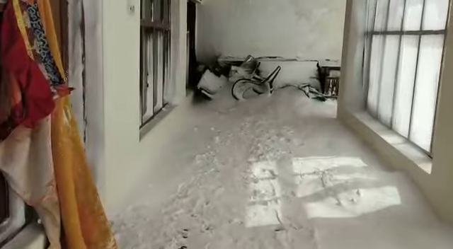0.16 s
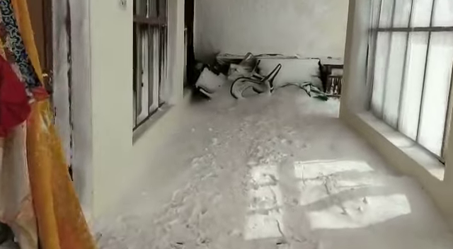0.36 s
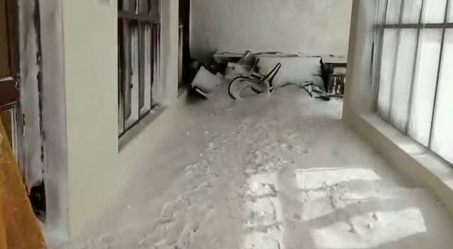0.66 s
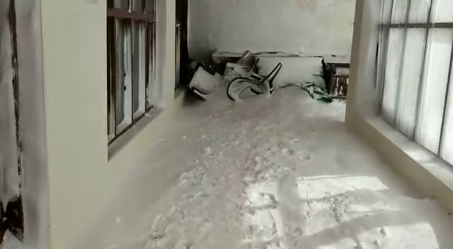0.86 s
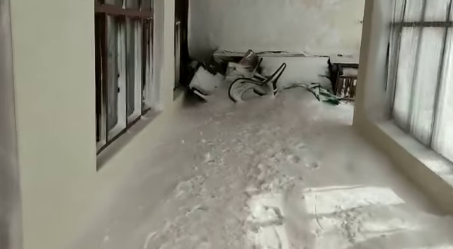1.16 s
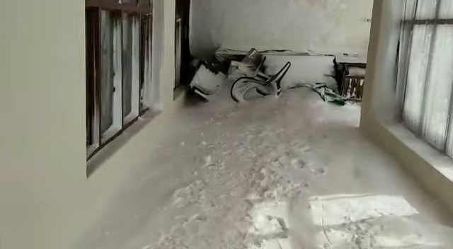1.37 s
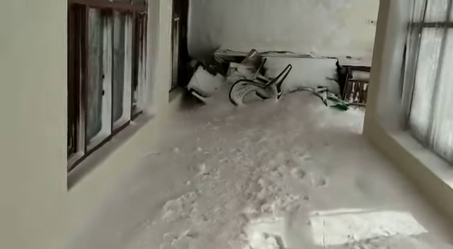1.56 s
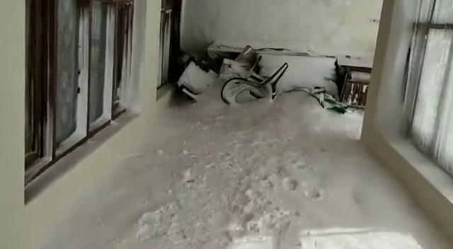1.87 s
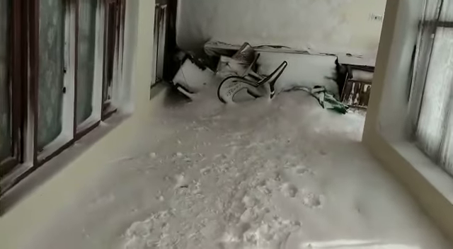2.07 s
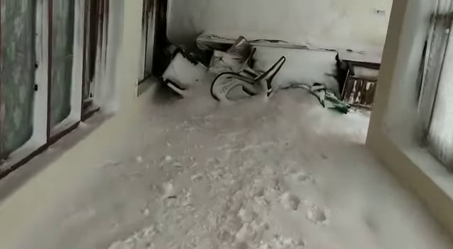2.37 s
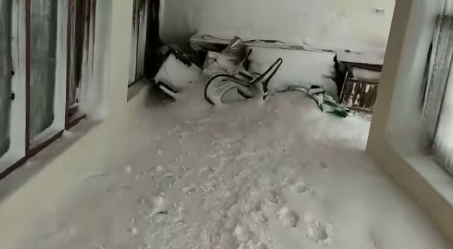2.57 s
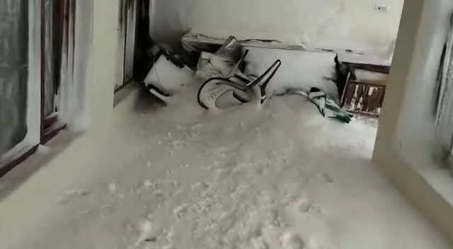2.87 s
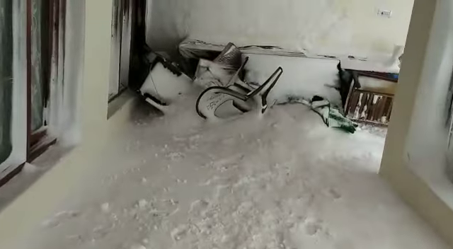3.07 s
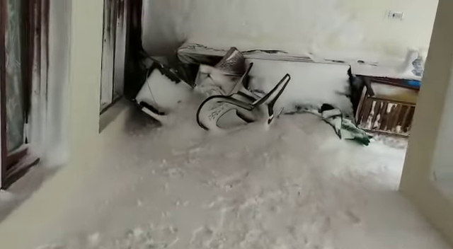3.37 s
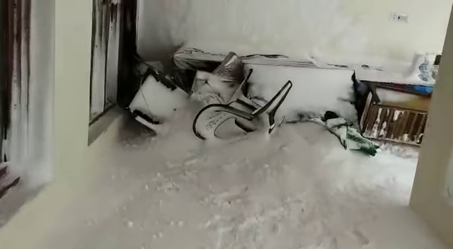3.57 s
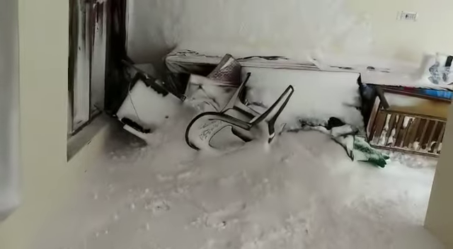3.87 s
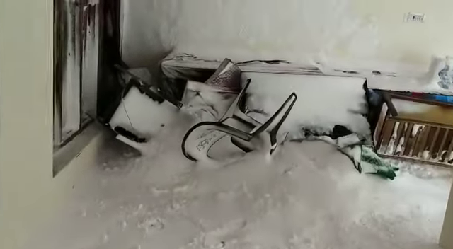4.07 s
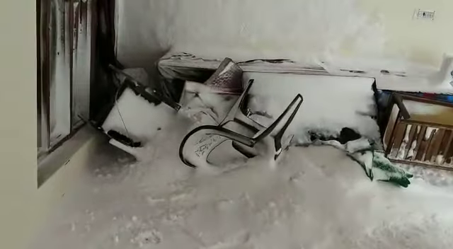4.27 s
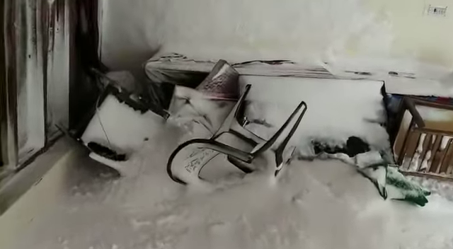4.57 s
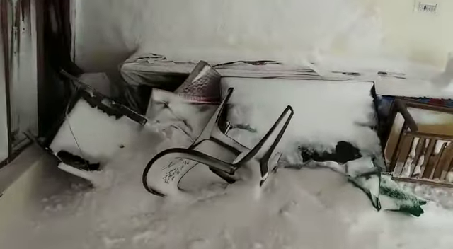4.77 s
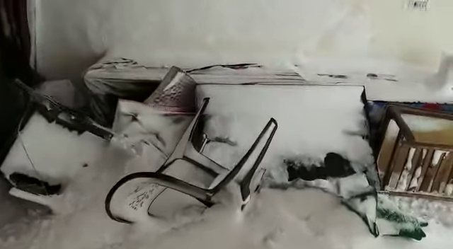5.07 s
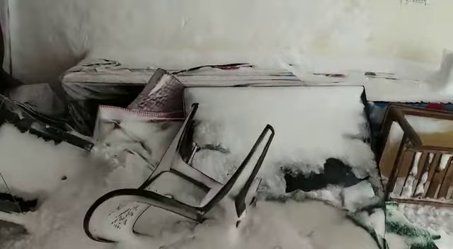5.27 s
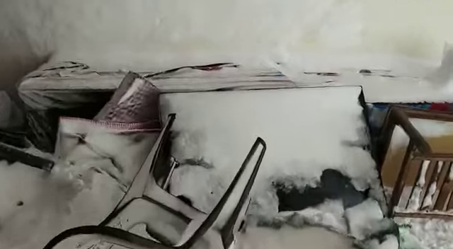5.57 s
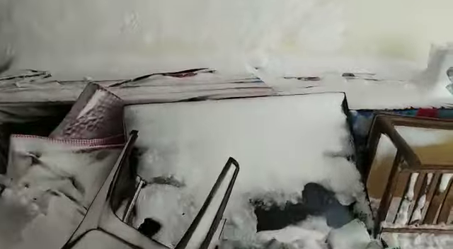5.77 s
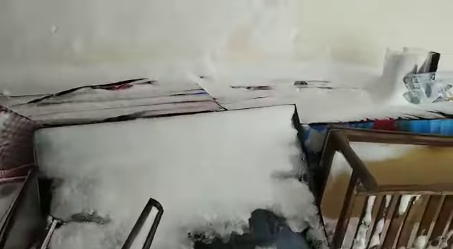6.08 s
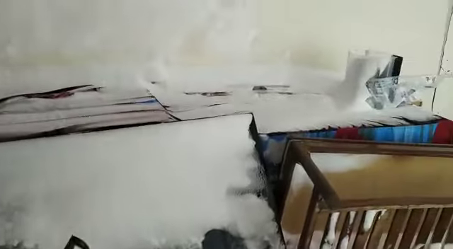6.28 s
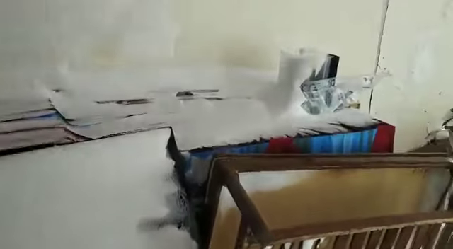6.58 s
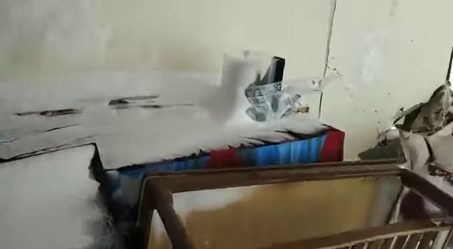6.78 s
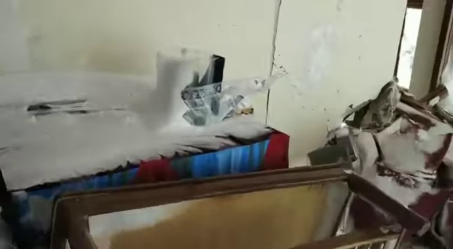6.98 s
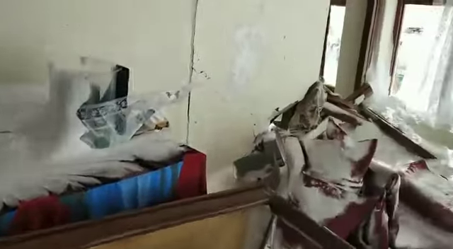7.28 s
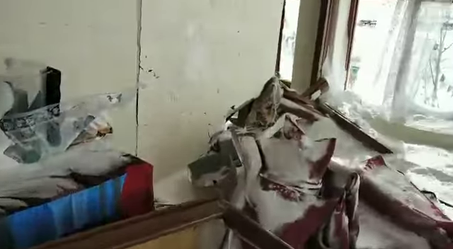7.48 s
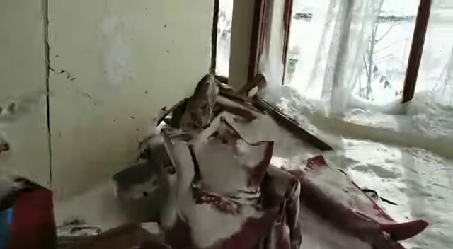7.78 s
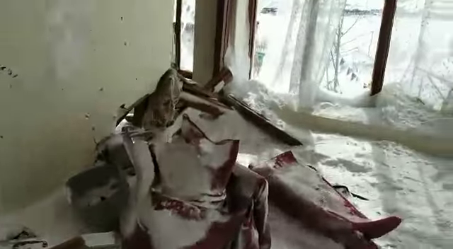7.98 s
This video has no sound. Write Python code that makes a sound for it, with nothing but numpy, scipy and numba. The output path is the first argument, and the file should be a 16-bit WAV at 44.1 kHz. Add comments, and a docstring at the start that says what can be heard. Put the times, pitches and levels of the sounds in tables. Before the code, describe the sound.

Boots crunch slowly through packed snow on the hollow floor of an enclosed room, with dull thuds, crisp snaps, icy grit and short creaks.

```python
"""Boots tread packed snow on the hollow floor of a glazed porch, under a hand-held two-port phone.
Packing snow is dull rings at the floor's modes, crust is short ringing grains, grit and powder are
showers of coloured clicks; louder slabs snap, thud and throw powder. Creaks, crumbs and thin squeaks join them.
The walls answer with a short noise echo and two humming standing waves, over wavering still air."""
import sys
import numpy as np
from scipy import signal
from scipy.fft import rfft, irfft, next_fast_len
from scipy.io import wavfile
from scipy.ndimage import uniform_filter1d
from numba import njit

SR = 44100
rng = np.random.default_rng(int(sys.argv[2]) if len(sys.argv) > 2 else 0)


def bounce(signal):
    """Save signal as a 16-bit WAV file at the path given by the first command-line argument."""
    frames = np.transpose(np.atleast_2d(signal))
    limited = np.clip(frames, -1, 1)
    pcm = np.round(limited * 32767).astype(np.int16)
    wavfile.write(sys.argv[1], SR, pcm)


N = 358533
LEFT_LEAD_S = 8e-5  # the left port hears the boots first


def crunch():
    """Packing, crust, grit and powder under the sole share sudden slips, each to its own degree."""
    pack_db, crust_db, grit_db, powder_db = stages()
    slip = slips(60, 0.047)
    return (packing() * undb(pack_db + 0.5001 * slip + 1.3 * walk(30))
            + crust(grit_db - crust_db) * undb(crust_db + 0.73 * slip)
            + grit() * undb(grit_db + 1.32 * slip)
            + powder(slip) * undb(powder_db))


# The sole sinking in stages. Each row: start in seconds, hold in seconds, then the levels in dB
# of packing, crust, grit and powder.
CRUSHES = [(0.0, 0.11, -39.5, -45, -46.5, -38.5), (0.363, 0.06, -42, -46.5, -47.5, -44),
           (0.45, 0.017, -34.5, -45.5, -46, -33), (0.485, 0.024, -40, -47.5, -45, -33),
           (0.54, 0.02, -45, -49.5, -48, -42), (0.58, 0.037, -35.5, -45, -42.5, -36),
           (0.647, 0.012, -38, -49, -44, -50), (0.763, 0.043, -49, -52.5, -58.5, -50.5),
           (0.873, 0.052, -43, -48, -48, -41), (0.997, 0.073, -34, -44, -44, -32),
           (1.09, 0.034, -39.5, -53, -60.5, -46), (1.17, 0.018, -45, -60.5, -59.5, -43),
           (1.46, 0.13, -41, -45.5, -48.5, -40.5), (1.621, 0.015, -41.5, -56, -37.5, -44),
           (1.875, 0.06, -43, -48, -50.5, -49), (1.975, 0.055, -42, -49, -50.5, -37.5),
           (2.055, 0.062, -39, -46, -46.5, -38), (2.363, 0.1, -44.5, -52.5, -53, -50),
           (2.48, 0.12, -38.5, -45, -46, -44), (2.619, 0.062, -40.5, -43.5, -43, -42),
           (2.701, 0.018, -49, -57.5, -52, -57), (2.913, 0.098, -42.5, -51, -50.5, -51),
           (3.06, 0.02, -33.5, -41, -40.5, -36.5), (3.135, 0.019, -34.5, -45.5, -44, -33),
           (3.448, 0.071, -48, -50.5, -53, -49.5), (3.56, 0.058, -32.5, -47.5, -46, -36.5),
           (3.68, 0.04, -40.5, -44.5, -40, -48), (4.074, 0.039, -35, -41.5, -38.5, -34),
           (4.178, 0.04, -34.5, -41.5, -40, -36), (4.256, 0.022, -41.5, -59, -48.5, -44),
           (4.429, 0.1, -41.5, -55, -50.5, -41.5), (4.558, 0.11, -31, -43.5, -43, -32),
           (4.708, 0.032, -37, -40.5, -36.5, -35), (4.776, 0.056, -45.5, -48, -45, -45.5),
           (5.031, 0.039, -35, -47, -55.5, -49), (5.093, 0.038, -48, -40.5, -38.5, -38),
           (5.186, 0.074, -37.5, -44, -45.5, -46), (5.597, 0.071, -52, -50, -55.5, -55),
           (5.654, 0.001, -39.5, -45.5, -44.5, -39), (5.731, 0.016, -41, -36.5, -37.5, -33),
           (5.769, 0.031, -57, -47.5, -41, -52), (5.799, 0.02, -49, -38.5, -42.5, -55),
           (5.852, 0.026, -45.5, -49.5, -47.5, -52), (6.081, 0.046, -41, -44, -45, -51),
           (6.201, 0.011, -39.5, -42, -41, -42.5), (6.266, 0.034, -38.5, -47.5, -47, -43.5),
           (6.56, 0.13, -45, -55.5, -58, -61), (6.729, 0.024, -33, -44.5, -45.5, -37.5),
           (6.793, 0.095, -35.5, -42.5, -43.5, -44), (7.164, 0.044, -44.5, -52, -62, -65),
           (7.236, 0.097, -40.5, -49.5, -51, -45), (7.366, 0.04, -35, -41, -41, -35.5),
           (7.464, 0.08, -50.5, -55.5, -54.5, -48.5), (7.653, 0.071, -46, -53.5, -56.5, -56),
           (7.789, 0.048, -34.5, -50, -48.5, -39.5), (7.897, 0.02, -33, -38.5, -35.5, -36.5),
           (7.95, 0.013, -38, -40.5, -41, -41)]
# How much loose snow trickles after a stage, along the porch. Each row: time in seconds, level in dB.
LOOSENESS = [(0.1, 4.5), (1.1, -12), (1.7, 7), (2.1, 4), (2.7, -6.5), (3.2, 3.5), (3.7, 6.5), (4.7, -7),
             (5.3, -2), (6.3, -23), (6.9, -5), (7.5, 5), (8, 2)]
# Rise and fall of a stage. Each list: packing, crust, grit, powder, in dB per second.
RISE_DB_S = (255, 335, 371, 384)
FALL_DB_S = (205, 278, 318.5, 304)
# Trickle of loosened snow, same order of layers: level in dB against the stage, fall in dB per second.
SETTLE_DB = (-23, -17, -18.5, -25)
SETTLE_FALL_DB_S = (10, 26, 34.2, 6.4)


def stages():
    """Levels in dB of the four layers: each stage rises, holds, falls and leaves a slow trickle."""
    t = np.arange(0, N / SR + .01, .002)
    s, hold, *tops_db = np.transpose(CRUSHES)[..., None]
    early, late = np.maximum(s - t, 0), np.maximum(t - s - hold, 0)
    loose_db = np.interp(s, *np.transpose(LOOSENESS))
    levels = []
    for top, rise, fall, settle, slow in zip(tops_db, RISE_DB_S, FALL_DB_S, SETTLE_DB, SETTLE_FALL_DB_S):
        after = undb(-fall * late) + undb(settle + loose_db - slow * late)
        gain = undb(top - rise * early) * after
        power_db = 10 * np.log10(np.sum(gain ** 2, axis=0))
        levels.append(np.interp(np.arange(N) / SR, t, power_db))
    return levels


# Resonances of the hollow floor. Each row: pitch in Hz, level in dB, time to fall 60 dB in seconds.
FLOOR_MODES = [(135, -7, 0.066), (160, -1.5, 0.053), (191, -0.5, 0.095), (242.6, 0.5, 0.074),
               (296.6, -0.5, 0.05), (358.6, -7, 0.1), (459, -4.5, 0.048)]
# How hollow the floor sounds along the porch. Each row: time in seconds, gain of the deep modes
# in dB per octave below 240 Hz.
HOLLOWNESS = [(0.1, -3), (0.5, 6), (1.05, 10), (1.55, 3), (2.05, 3.5), (2.55, 7.5), (3.05, 0), (3.55, 2),
              (3.72, -5), (4.15, -4), (4.6, 5), (5.15, 0.5), (5.7, 7), (6.2, 5), (6.75, -8), (7.3, 9.5),
              (7.9, -12)]


def packing():
    """Dull breaks in the packing snow each ring one floor mode, opening with a higher crack."""
    at_s, size, lead_s, pan_db, odd = grains(2.4, 1e-4, count=2800)
    hz, db, t60 = np.array(FLOOR_MODES)[rng.integers(len(FLOOR_MODES), size=len(odd))].T
    hollow_db = np.interp(at_s, *np.transpose(HOLLOWNESS))
    size = size * undb(db + hollow_db * np.maximum(np.log2(240 / hz), 0))
    dull = unit_cracked = rings(at_s, size, lead_s, pan_db, hz * np.exp(0.047 * odd), t60, 0.0075)
    crack = rings(at_s, size, lead_s, pan_db, 2.95 * hz, 4.6 / (3 * hz), 0.17)
    return unit(dull + 0.7 * crack)


CRUST_HZ, CRUST_OCT_PER_DB = 1180, 0.53  # the grittier a stage against its crust, the higher the grains
CRUST_TOP_HZ = 2330  # ceiling before the pitches scatter


def crust(grittiness_db):
    """Crust grains ring briefly, scattered round a pitch that follows the grittiness of the stage."""
    at_s, size, lead_s, pan_db, odd = grains(2.46, 0.00027, count=7500)
    sample = (at_s * SR).astype(int)
    slab_hz = CRUST_HZ * 2 ** (CRUST_OCT_PER_DB * grittiness_db[sample])
    slab_hz = np.minimum(slab_hz, CRUST_TOP_HZ)
    clump = walk(70)[sample]  # neighbours in time come from one clump
    hz = np.clip(slab_hz * np.exp(0.35 * odd + 0.24 * clump), 400, 6000)
    return unit(rings(at_s, size, lead_s, pan_db, hz, 11 / hz, 0.089))


# Colour of grit. Each row: frequency in Hz, level in dB per Hz.
GRIT = [(1200, 0.5), (2000, 0.5), (3200, -3), (4500, -3), (7000, -10.5), (16000, -7.5)]


def grit():
    """A shower of coloured clicks, whose harder chips flicker in level."""
    shower = unit(colour(clicks(*grains(0.43, 1.2e-4, count=9000)[:4]), GRIT))
    chips = band(shower, 2400, 4500)
    return shower + chips * (undb(2.08 * walk(20)) - 1)


# Colour of powder. Each row: frequency in Hz, level in dB per Hz.
POWDER = [(2500, -5.5), (4500, -4), (7000, -2), (11000, 0), (13500, -2.5), (16000, 3.5)]
# Sizes of dust. Each row: low edge in Hz, high edge in Hz.
DUST_BANDS = [(6500, 8800), (9000, 10750), (12000, 15300)]
DUST_FLICKER_DB = 0.5


def powder(slip):
    """A dense hiss of tiny clicks, each size of dust and the coarser crystals coming and going alone."""
    hiss = unit(colour(clicks(*grains(0.67, 3e-4, count=80000)[:4]), POWDER))
    hiss = hiss * undb(1.32 * slip + 3.3 * walk(25))
    for lo_hz, hi_hz in DUST_BANDS:
        flicker_db = DUST_FLICKER_DB * walk(18) + 1.56 * slips(32, 0.011)
        hiss = hiss + band(hiss, lo_hz, hi_hz) * (undb(flicker_db) - 1)
    crystals_db = 2.9 * walk(22) + 1.86 * slips(33, 0.019) + swish_db()
    return hiss + band(hiss, 3500, 7000) * (undb(crystals_db) - 1)


# The boot sweeps coarse crystals aside, in one row: centre in seconds, half length in seconds, swell in dB.
SWISH = (7.5, 0.04, 7)


def swish_db():
    """A brief bell-shaped swell of the coarser crystals."""
    s, half, db = SWISH
    return db * np.exp(-((np.arange(N) / SR - s) / half) ** 2)


# Loud breaks. Each row: start in seconds, snap level in relative dB, snap pitch in Hz,
# thud level in relative dB, thud pitch in Hz, powder burst level in relative dB.
BREAKS = [(0.098, -43, 700, -25, 238, -53), (0.154, -48, 810, -26.5, 245, -48),
          (0.259, -19.5, 2100, -30.5, 300, -47.5), (0.323, -25, 680, -28, 262, -43.5),
          (0.352, -27, 953, -24, 273, -46), (0.383, -19, 590, -23.5, 298, -42),
          (0.427, -36, 700, -20, 257, -52), (0.531, -36, 700, -25, 245, -55),
          (0.584, -25, 904, -22, 221, -35.5), (0.605, -13, 1800, -43, 240, -46),
          (0.658, -17, 2500, -44, 240, -49), (0.833, -18.5, 655, -63.5, 350, -61),
          (0.845, -41, 900, -54, 250, -46), (0.879, -30, 1200, -32, 253, -53),
          (0.982, -14, 1020, -19.5, 310, -31), (1.007, -9.5, 760, -17.5, 255, -53),
          (1.048, -30, 900, -36, 250, -45), (1.087, -37, 700, -27, 242, -53),
          (1.108, -13, 630, -21, 237, -42.5), (1.289, -27, 695, -34, 247, -63),
          (1.338, -25.5, 940, -35.5, 252, -50.5), (1.381, -31, 800, -35, 252, -52),
          (1.444, -53, 604, -17, 180, -41), (1.513, -13.5, 627, -20, 184, -37),
          (1.604, -19, 711, -19, 238, -37.5), (1.618, -11, 2650, -27, 230, -40),
          (1.65, -13, 1580, -47, 226, -43), (1.677, -42, 700, -31, 258, -62),
          (1.795, -26, 600, -31, 245, -45), (1.842, -22, 607, -28, 193, -44),
          (1.901, -16, 666, -20, 246, -62), (1.926, -26, 1300, -28, 240, -57),
          (1.953, -40, 700, -26, 248, -55), (1.976, -29, 700, -21.5, 240, -60),
          (2.021, -32, 700, -27, 209, -57), (2.074, -28, 616, -18, 199, -51),
          (2.133, -43, 700, -22, 223, -59), (2.174, -45.5, 700, -31.5, 193, -66),
          (2.354, -41, 700, -40, 225, -64), (2.386, -39, 624, -30, 234, -53.5),
          (2.44, -43, 700, -28, 250, -58), (2.467, -43, 732, -46, 275, -40.5),
          (2.496, -37, 834, -21, 237, -40), (2.553, -16, 1450, -29, 240, -56),
          (2.604, -21, 620, -48, 275, -38), (2.677, -11.5, 1550, -48, 240, -45),
          (2.706, -25, 1900, -50, 240, -49), (2.818, -36, 1000, -55, 250, -86),
          (2.89, -41, 1000, -41, 250, -53), (2.92, -35.5, 870, -46, 252, -64),
          (2.986, -40, 1200, -45, 250, -44), (3.033, -40, 700, -22.5, 235, -51),
          (3.048, -24, 1000, -21, 283, -41), (3.065, -13, 2200, -53, 213, -55),
          (3.074, -22, 1500, -36, 240, -50), (3.1, -33, 900, -18, 245, -39),
          (3.14, -19, 820, -54, 293, -41), (3.438, -17, 825, -26, 440, -43.5),
          (3.491, -19.5, 620, -22, 228, -43), (3.538, -41, 705, -16.5, 210, -32.5),
          (3.549, -40, 700, -14, 200, -57), (3.575, -35, 700, -23.5, 222, -45),
          (3.683, -12.5, 1150, -45, 223, -32), (3.699, -20, 650, -30, 297, -43),
          (3.727, -13, 1900, -52, 223, -44), (3.735, -11, 1800, -53, 240, -50),
          (3.962, -46, 700, -32.5, 238, -52), (4.02, -25, 700, -29, 240, -65),
          (4.041, -27, 600, -35, 256, -65), (4.06, -13, 2260, -32, 248, -30),
          (4.092, -9, 2500, -20.5, 304, -34.5), (4.14, -42, 800, -21.5, 233, -40),
          (4.186, -37, 900, -25, 245, -45), (4.241, -36, 800, -26, 238, -58),
          (4.418, -40, 1670, -24.5, 191, -42.5), (4.456, -39, 840, -30, 228, -54),
          (4.485, -42, 700, -23, 196, -45), (4.555, -26, 600, -10.5, 220, -57),
          (4.573, -40, 700, -17, 215, -62), (4.643, -14, 590, -19.5, 354, -36),
          (4.696, -16.5, 850, -21, 237, -47), (4.763, -40, 800, -30, 248, -60),
          (4.909, -28, 910, -53, 334, -62), (4.972, -26, 1190, -33, 235, -73),
          (5.002, -15.5, 585, -24.5, 233, -42), (5.061, -13, 1960, -21, 350, -54),
          (5.097, -15, 1400, -43, 215, -41), (5.118, -16, 1100, -33, 300, -50),
          (5.2, -38, 611, -24, 288, -49), (5.231, -17, 726, -20, 191, -54),
          (5.274, -18.5, 608, -24, 203, -44), (5.518, -30, 1190, -41, 260, -63),
          (5.531, -31, 900, -39, 305, -62), (5.558, -24.5, 754, -28.5, 255, -51),
          (5.596, -18.5, 870, -26, 180, -51), (5.633, -28, 1200, -33, 300, -57),
          (5.649, -26, 953, -20, 315, -37), (5.66, -24, 800, -46, 300, -55),
          (5.697, -23, 670, -22.5, 318, -36.5), (5.727, -11, 800, -34, 400, -43),
          (5.735, -6, 900, -13, 450, -34), (5.746, -19, 650, -31, 400, -52),
          (5.786, -22, 1600, -36, 300, -57), (5.807, -6.5, 950, -17.5, 258, -33),
          (6.043, -25, 750, -33, 254, -39.5), (6.07, -24, 703, -41, 291, -40),
          (6.09, -12, 760, -53, 345, -44), (6.095, -16, 750, -36, 345, -47),
          (6.113, -25, 1000, -40, 300, -52), (6.149, -18, 640, -23, 215, -44),
          (6.183, -30, 1500, -29, 250, -45), (6.192, -40, 700, -24, 223, -58),
          (6.251, -37, 700, -28, 205, -58), (6.31, -40, 700, -28, 215, -58),
          (6.37, -26, 825, -60, 274, -80), (6.532, -26, 730, -28, 366, -53),
          (6.605, -20.5, 604, -20, 209, -48), (6.644, -24.5, 876, -28, 209, -49),
          (6.675, -35, 657, -23, 256, -62), (6.693, -40, 600, -20, 241, -63),
          (6.708, -42, 600, -15, 237, -36.5), (6.732, -19, 660, -26, 272, -31.5),
          (6.8, -30, 716, -20, 256, -42), (6.811, -27, 900, -24.5, 298, -37.5),
          (6.883, -22, 1300, -33, 262, -52), (6.895, -21, 800, -25, 260, -49),
          (6.904, -19.5, 900, -26.5, 269, -48), (6.928, -20, 1100, -50, 231, -52),
          (6.967, -23, 834, -32.5, 350, -50), (7.051, -24.5, 885, -36, 237, -62),
          (7.059, -34, 1200, -58, 240, -75), (7.102, -26.5, 844, -55, 248, -64),
          (7.126, -30, 1070, -31, 367, -55), (7.135, -39, 1300, -48, 250, -75),
          (7.15, -27, 870, -28, 240, -64), (7.176, -25, 850, -44, 369, -51),
          (7.196, -26, 900, -43, 260, -64), (7.224, -32, 636, -21, 227, -50),
          (7.242, -32, 700, -24, 260, -63), (7.276, -45, 900, -38, 250, -35.5),
          (7.309, -25, 829, -27, 362, -39), (7.397, -13, 935, -38, 251, -54),
          (7.401, -37, 700, -13, 197, -54), (7.453, -24, 900, -26, 280, -49),
          (7.51, -31, 721, -36, 270, -52), (7.551, -37, 805, -45.5, 256, -69),
          (7.638, -24, 910, -30, 244, -55), (7.679, -22.5, 810, -46, 264, -68),
          (7.712, -21, 940, -25.5, 217, -69), (7.747, -20.5, 820, -29, 251, -66),
          (7.783, -36, 1570, -19.5, 259, -36.5), (7.826, -23, 999, -26, 227, -56),
          (7.85, -29, 700, -19, 274, -60), (7.885, -15, 850, -24, 256, -44),
          (7.945, -31, 700, -20, 410, -45), (7.975, -28, 900, -25, 243, -52),
          (8.036, -28, 1010, -25, 264, -50)]
SNAP_LAG_S = 0.001176  # the snap follows the first powder
KNOCK_CYCLES, SWELL_CYCLES = 10.4, 4  # cycles of the knock's ring and of its swell
BREAK_PAN_DB, BREAK_PAN_SPREAD_DB = 0.2, 4  # left minus right


def breaks():
    """Each slab that gives way snaps, thuds into the floor and throws a burst of powder."""
    s, snap_db, snap_hz, thud_db, thud_hz, burst_db = np.transpose(BREAKS)
    crack_s = s + SNAP_LAG_S
    pan_db = BREAK_PAN_DB + BREAK_PAN_SPREAD_DB * rng.standard_normal(len(s))
    out = rings(crack_s, undb(snap_db - 13.5), LEFT_LEAD_S, pan_db, snap_hz, 12.8 / snap_hz, 0.023)
    # a shorter, higher ring sharpens the edge
    out = out + rings(crack_s, undb(snap_db - 17.0), LEFT_LEAD_S, pan_db, 1.33 * snap_hz, 6.5 / snap_hz, 0.21)
    for hz, db, t60 in FLOOR_MODES:
        off_db = 18 * np.abs(np.log2(hz / thud_hz))  # each blow wakes the modes nearest its own pitch
        size = undb(thud_db - 10.0 - off_db)
        out = out + rings(s + 0.0017, size, LEFT_LEAD_S, 0 * s, hz + 0 * s, t60 + 0 * s, 0.013)
    # the slab's own short knock swells, then dies: a long ring minus a short one
    for cycles, sign in ((KNOCK_CYCLES, 1), (SWELL_CYCLES, -1)):
        size = sign * undb(thud_db - 5.5)
        out = out + rings(crack_s, size, LEFT_LEAD_S, 0 * s, thud_hz, cycles / thud_hz, 0.)
    fade = np.exp(-np.arange(SR // 10) / SR / 0.018)
    burst = signal.fftconvolve(clicks(s, undb(burst_db), 0, pan_db), fade[None], axes=1)[:, :N]
    spray = rng.standard_normal((2, N))
    return out + burst * (unit(colour(spray, POWDER)) + 0.37 * unit(colour(spray, GRIT)))


# Creaks of pressed crust. Each row: start in seconds, length in seconds, pitch in Hz, level in dB.
CREAKS = [(0.442, 0.032, 2220, -42), (1.595, 0.025, 1800, -47), (1.63, 0.038, 2180, -34),
          (2.672, 0.023, 3650, -27.5), (3.6, 0.053, 2200, -32.5), (3.72, 0.021, 1860, -33),
          (4.056, 0.032, 2120, -33), (4.079, .025, 2950, -22), (4.701, 0.023, 1160, -32.5),
          (4.729, 0.026, 2250, -29), (5.1, .035, 1470, -29.5), (6.111, 0.018, 805, -36),
          (6.294, 0.023, 2750, -38), (6.455, 0.016, 1920, -65), (7.884, 0.031, 850, -28.5),
          (7.896, 0.028, 2080, -41)]
CREAK_CYCLES = 9.3  # cycles in which a slip falls 60 dB


def creaks():
    """Each creak is a quick run of eight slips that ring near one pitch."""
    s, length, hz, db = np.transpose(CREAKS)[..., None]
    u = rng.random((len(CREAKS), 2, 8))
    at_s = (s + length * u[:, 0]).ravel()
    pitch = (hz * np.exp(0.22 * (u[:, 1] - .5))).ravel()
    size = (undb(db) + 0 * u[:, 0]).ravel()
    return rings(at_s, size, LEFT_LEAD_S, 0 * size, pitch, CREAK_CYCLES / pitch, 0.026)


CRUMB_DB, CRUMB_HZ = -58, 1084  # middle of their wavering level, middle of their scattered pitches


def crumbs():
    """Stray crumbs of crust drop all along, each a short ring."""
    *where, odd = grains(3.8, 0.00018, count=2000)
    hz = np.clip(CRUMB_HZ * np.exp(0.5 * odd), 300, 5000)
    return undb(CRUMB_DB + 3.4 * walk(12)) * rings(*where, hz, 12 / hz, 0.087)


# Thin squeaks. Each row: start in seconds, length in seconds, first pitch in Hz, last pitch in Hz, level in dB.
SQUEAKS = [(1.816, 0.028, 14500, 15000, -45), (7.528, 0.068, 10700, 9100, -54)]


def squeaks():
    """Faint high gliding whistles, perhaps rubber on ice."""
    out, t = np.zeros(N), np.arange(N) / SR
    for s, length, first_hz, last_hz, db in SQUEAKS:
        part = np.clip((t - s) / length, 0, 1)
        hz = last_hz + (first_hz - last_hz) * (1 - part) ** 2
        out += undb(db) * np.sin(np.pi * part) ** .5 * np.sin(2 * np.pi * np.cumsum(hz) / SR)
    return out


ECHO_T60_S, ECHO_DB = 0.16, -4
ECHO_ALIKE_HZ = 645  # below this the echo is much alike at both ports


def porch(dry):
    """A short diffuse echo from walls and glass: fading noise, drawn anew each quarter second."""
    t, out, hop = np.arange(SR // 2) / SR, np.zeros((2, N + 2 * SR)), SR // 4
    source = np.pad(dry.mean(axis=0), (hop, 2 * hop))
    for start in range(0, N + hop, hop):
        fade = np.exp(-np.log(1000) * t / ECHO_T60_S) * (t > .004)
        tail = alike_in_bass(len(t), ECHO_ALIKE_HZ) * fade
        piece = source[start:start + 2 * hop] * np.hanning(2 * hop)  # overlapping pieces crossfade
        echo = signal.fftconvolve(piece[None], tail / np.sqrt(np.sum(tail ** 2) / 2), axes=1)
        out[:, start:start + echo.shape[1]] += echo
    return undb(ECHO_DB) * out[:, hop:hop + N]


# Standing waves that hum on after a tread. Each row: pitch in Hz, time to fall 60 dB in seconds, level in dB.
PORCH_MODES = [(124.8, 0.49, 3.5), (242, 0.3, -13.5)]


def hum(dry):
    """Narrow standing waves between the walls, alike at both ports."""
    source, out = dry.mean(axis=0), 0
    for hz, t60, db in PORCH_MODES:
        quality = np.pi * hz * t60 / np.log(1000)
        out = out + undb(db) * signal.lfilter(*signal.iirpeak(hz, quality, fs=SR), source)
    return out


# Colour of the still air. Each row: frequency in Hz, level in dB per Hz.
STILL = [(18, -83), (30, -50), (60, -40), (95, -29), (125, -18), (170, -9), (233, -3), (526, -13.5),
         (2120, -18.5), (3220, -23.5), (5500, -23.5), (14000, -22.5), (16000, -21.5)]
STILL_DB = -53.5  # rms before the middle wavers
RUSTLE_DB = 3.5  # how much the middle wavers


def still_air():
    """Coloured noise, much alike at both ports in the bass, with four octaves that waver on their own."""
    still = unit(colour(alike_in_bass(N, 530), STILL)) * undb(STILL_DB)
    for lo_hz in (500, 1000, 1990, 3940):
        still = still + band(still, lo_hz, 2 * lo_hz) * (undb(RUSTLE_DB * walk(14)) - 1)
    return still


def undb(db):
    """Decibels to gain."""
    return 10 ** (np.asarray(db) / 20)


def unit(x):
    """Scale to rms 1."""
    return x / np.sqrt(np.mean(x ** 2))


def band(x, lo_hz, hi_hz):
    """The part of a sound between two frequencies."""
    return signal.sosfilt(signal.butter(2, [lo_hz, hi_hz], "band", fs=SR, output="sos"), x)


def colour(x, table):
    """Shape a sound by (Hz, dB) points joined on a log axis."""
    size = next_fast_len(N)
    hz, db = np.transpose(table)
    axis_hz = np.arange(size // 2 + 1) * SR / size + 1
    gain = undb(np.interp(np.log(axis_hz), np.log(hz), db))
    return irfft(rfft(x, size) * gain, size)[..., :N]


def walk(rate):
    """Random levels held 1 / rate s and slewed; spread near 1."""
    k = int(SR / rate)
    return uniform_filter1d(np.repeat(rng.standard_normal(N // k + 1), k), k // 2)[:N]


def slips(rate, fade_s):
    """Sudden slips, rate per second, that die away; mean 0, spread 1."""
    jumps = (rng.random(N) < rate / SR) * np.minimum(rng.exponential(size=N), 2.0)
    x = signal.lfilter([1], [1, -np.exp(-1 / (fade_s * SR))], jumps)
    return unit(x - x.mean())


def alike_in_bass(size, split_hz):
    """Two noises, sharing one source below a gentle split and unrelated above it."""
    low = signal.lfilter(*signal.butter(1, split_hz, fs=SR), rng.standard_normal(size))
    return low + signal.lfilter(*signal.butter(1, split_hz, "high", fs=SR), rng.standard_normal((2, size)))


def grains(scatter_db, spread_s, count):
    """Random breaks all round the boot: time, size, lead, pan and a spare draw; a few are larger."""
    u = rng.random((count, 3)).T
    g = rng.standard_normal((count, 3)).T
    size = np.sign(u[1] - .5) * undb(scatter_db * np.minimum(-np.log(1 - u[2]), 3.5))
    return u[0] * N / SR, size, LEFT_LEAD_S + spread_s * g[0], 5.0 * g[1], g[2]


def ports(at_s, size, lead_s, pan_db):
    """Arrival samples and gains at the two ports; the left arrives earlier by the lead."""
    start = (np.array([at_s - lead_s, at_s]) * SR).astype(np.int64)
    return start, size * undb(np.array([pan_db, -pan_db]) / 2)


@njit
def add(out, start, gain, hz, t60, glide):
    """Add one decaying sine per grain to each port; its pitch sinks by the fraction glide."""
    for k in range(len(hz)):
        z, p = 1 + 0j, np.exp(2j * np.pi * hz[k] / SR - np.log(1000) / (t60[k] * SR))
        size = int(.8 * t60[k] * SR) + 1
        bend = np.exp(-2j * np.pi * hz[k] * glide / SR / size)
        for i in range(size):
            for c in range(2):
                j = start[c, k] + i
                if 0 <= j < out.shape[1]:
                    out[c, j] += gain[c, k] * z.imag
            z *= p
            p *= bend


def rings(at_s, size, lead_s, pan_db, hz, t60, glide):
    """Grains that ring at their own pitch."""
    out = np.zeros((2, N))
    add(out, *ports(at_s, size, lead_s, pan_db), 1. * hz, 1. * t60, glide)
    return out


def clicks(at_s, size, lead_s, pan_db):
    """Bare impulses at both ports."""
    out = np.zeros((2, N))
    for port, start, gain in zip(out, *ports(at_s, size, lead_s, pan_db)):
        np.add.at(port, np.clip(start, 0, N - 1), gain)
    return out


BREAK_ECHO_DB = -2.5  # snow muffles breaks right under the sole before they reach the walls


def scene():
    """Boots, their echo and hum, and the still air."""
    slabs = breaks()
    boots = crunch() + creaks() + crumbs() + squeaks()
    echo = porch(boots + undb(BREAK_ECHO_DB) * slabs)
    return boots + slabs + echo + hum(boots + slabs) + still_air()


# Right port of the phone. Each row: frequency in Hz, level in dB against the left.
RIGHT_PORT = [(200, -0.27), (700, -0.5), (1300, -0.6), (2400, 2), (4400, -1.4), (8100, -2), (12000, -5.5),
              (16000, -8)]
# The hand jolts the phone. Each row: start in seconds, level in dB.
JOLTS = [(0.259, -63), (0.982, -48), (1.345, -68), (3.549, -58), (4.629, -72)]
BASS_CUT_HZ, TOP_HZ = 195.5, 15700
BASS_LEAK_DB, LEAK_CUT_HZ = -36, 54  # the bass cut is deep but not total


def record(dry):
    """The right port is duller; the phone cuts bass and top, and deep jolts of the hand come through."""
    both = np.array([dry[0], colour(dry[1], RIGHT_PORT)])
    cut = signal.sosfilt(signal.butter(6, BASS_CUT_HZ, "high", fs=SR, output="sos"), both)
    leak = signal.lfilter(*signal.butter(2, LEAK_CUT_HZ, "high", fs=SR), both)
    s, db = np.transpose(JOLTS)
    jolts = rings(s, undb(db), 0, 0 * s, 45 + 0 * s, 0.05 + 0 * s, .1)
    both = cut + undb(BASS_LEAK_DB) * leak + jolts
    return signal.sosfilt(signal.ellip(10, .2, 80, TOP_HZ, fs=SR, output="sos"), both)


dry = scene()
out = record(dry)
bounce(out)
```